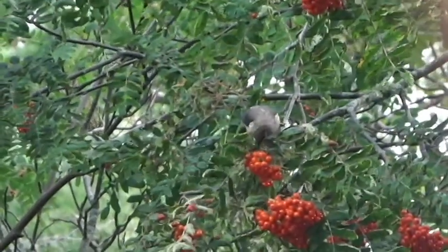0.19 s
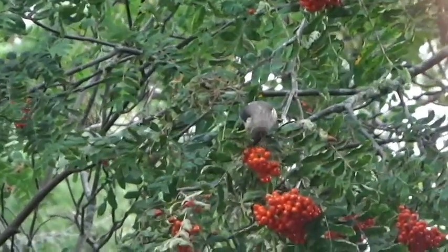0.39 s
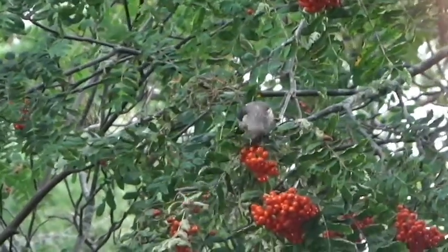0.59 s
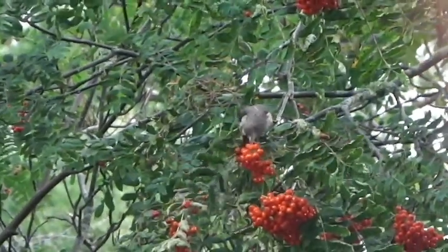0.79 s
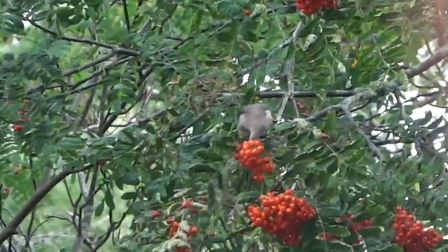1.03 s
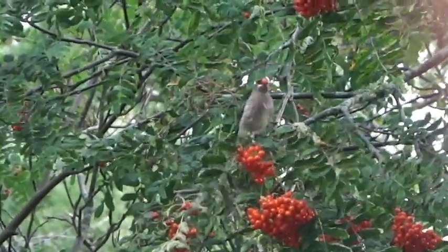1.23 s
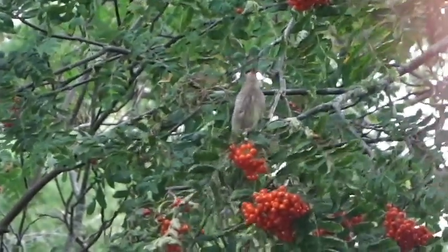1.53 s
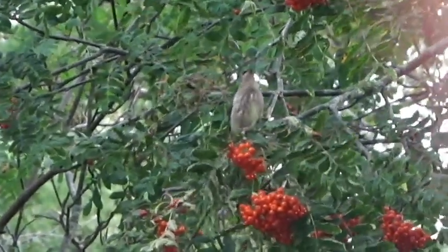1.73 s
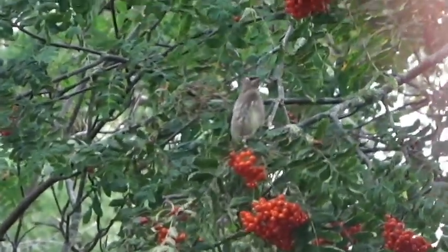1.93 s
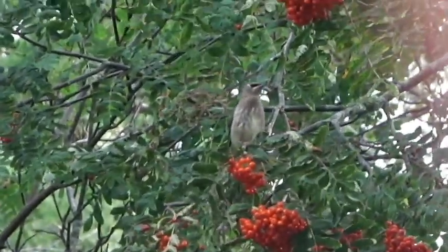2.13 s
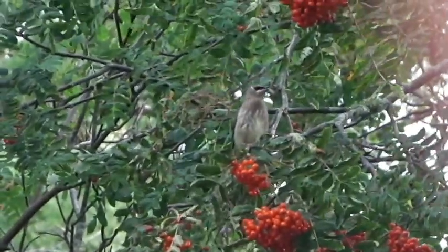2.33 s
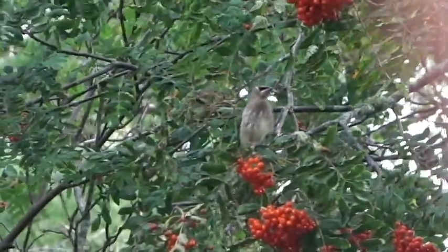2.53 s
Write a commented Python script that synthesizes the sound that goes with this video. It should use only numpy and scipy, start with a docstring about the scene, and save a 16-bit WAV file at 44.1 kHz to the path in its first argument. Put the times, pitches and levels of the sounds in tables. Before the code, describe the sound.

Waxwings trill thin and high outdoors, with one sharp snap and faint distant yelps.

```python
"""Waxwings trill thinly in a rowan tree: high whistles that buzz as their pitch shakes very fast,
scattered by the leaves. A farther bird, perhaps a jackdaw, gives short nasal yelps that rise and
fall, two of them clear, and distant trunks echo them. Close by come one sharp, ringing snap,
a few soft knocks and dull handling bumps. Twigs tick faintly over a quiet outdoor haze."""
import sys
import numpy as np
from scipy import signal
from scipy.fft import rfft, irfft
from scipy.io import wavfile
from scipy.ndimage import uniform_filter1d

SR = 44100
rng = np.random.default_rng(int(sys.argv[2]) if len(sys.argv) > 2 else 0)


def waveform_to_disk(signal):
    """Save audio, clipped to [-1, 1], as 16-bit WAV at the path in sys.argv[1]."""
    frames = np.transpose(np.atleast_2d(signal))
    scaled = np.clip(frames, -1, 1) * 32767
    samples = np.round(scaled).astype(np.int16)
    wavfile.write(sys.argv[1], SR, samples)


N = 119070  # 2.7 seconds

# Near waxwing calls, one a row. pan_db is left minus right; more roughness means a deeper buzz.
# start_s, length_s, first_pitch_hz, last_pitch_hz, level_db, trills_per_s, pan_db, roughness
NEAR_TRILLS = [(.503, 0.013, 7250, 7360, -51, 56, -2, .2), (.518, 0.055, 7070, 7280, -53, 29, -4, 1.3),
               (.552, 0.19, 7420, 6830, -47, 18.5, -2, 1.15), (.91, 0.1, 6850, 6510, -53, 35.4, -6.5, 0.88),
               (1.63, 0.13, 7440, 7400, -60.5, 36, -13, 1.03),
               (1.731, 0.083, 7570, 7400, -56, 35, -11, 0.73),
               (1.925, 0.245, 7290, 7000, -45, 35.2, -1.5, 1.08),
               (2.124, 0.18, 8240, 7430, -47.5, 40, 0.5, 1.47),
               (2.284, 0.166, 7130, 6750, -47, 30.3, -3, 1.01)]
# Thin, higher calls from deeper in the tree, with the same columns.
THIN_TRILLS = [(.055, 0.17, 8250, 8240, -58.5, 36.5, -2.7, 1.14),
               (.3, 0.15, 8300, 8280, -61, 37.7, -3, 0.85), (.36, 0.15, 7600, 7450, -64.5, 35.3, 1, .6),
               (.54, 0.21, 8100, 8320, -62.5, 37.3, 0, 1), (.795, 0.18, 8160, 8100, -57.5, 38, -3, 1.9),
               (1.235, 0.31, 8320, 8180, -59.5, 36.5, -5.5, 1.05),
               (1.555, 0.19, 8220, 8450, -57.5, 36.5, -1.95, 0.9),
               (1.825, 0.133, 8160, 8140, -53.5, 36.4, -4, 1.5),
               (1.945, 0.073, 8350, 8370, -50.5, 37, -2, 0.74), (2.39, 0.13, 8040, 7400, -63, 36.4, -2, 1)]

def waxwings(calls, buzz_per_s, buzz_hz, trill_hz, jitter_hz, throb_db, calm):
    """Each call is one buzzing whistle that gets higher, louder and purer at every trill crest."""
    out = np.zeros((2, N))
    attack_s, release_s = 0.009, 0.0096
    for start, length, first_hz, last_hz, db, trills_per_s, pan_db, roughness in calls:
        t = np.arange(0, length, 1 / SR)
        progress, size = t / length, len(t)
        crest = np.sin(np.pi * trills_per_s * t) ** 2
        trill = 2 * crest - 1
        # The buzz deepens through the call and eases at each crest.
        depth = roughness * (0.7 + progress / 2) * (1 - calm * crest ** 2)
        buzz = 2 * np.pi * np.cumsum(buzz_per_s * (1 + 0.217 * wander(size, 83))) / SR
        sweep = np.sin(buzz) + np.sin(2 * buzz) / 2  # quickly up, more slowly down
        hz = first_hz + (last_hz - first_hz) * progress ** 1.6 + trill_hz * trill
        hz += depth * (buzz_hz * sweep + jitter_hz * np.tanh(wander(size, 455)))
        phase = 2 * np.pi * np.cumsum(hz) / SR
        whistle = np.sin(phase) + amp(-28.5) * np.sin(2 * phase)
        fade = np.clip(np.minimum(t / attack_s, (length - t) / release_s), 0, 1)
        swell = amp(3 * np.sin(np.pi * progress) + throb_db * trill + 1.4 * wander(size, 77))
        pulse = 1 - np.clip(0.4 * depth, 0, 1) * np.cos(buzz)
        add(out, start, pan(pan_db) * amp(db) * unit(fade * swell * pulse * whistle))
    return out

# The farther bird's yelps: start_s, length_s, top_pitch_hz, level_db, upper_overtones_db, pan_db
YELPS = [(0.1, 0.074, 646, -66, -9, -3), (0.27, 0.053, 660, -62, 1, -4), (.36, .08, 513, -64.5, -8, -3),
         (1.027, .076, 517, -50.5, -11.5, -6.5), (1.307, 0.071, 553.7, -45, -0.5, -9.5)]
# The overtones of its voice: pitch_multiple, level_db
YELP_OVERTONES = [(2, -18), (3, 0), (4, -22), (5, -2), (6, -10), (8, -11)]
# How its throat boosts or softens them: frequency_hz, gain_db
YELP_THROAT = [(900, -11), (1300, -4.5), (1650, 0.5), (2800, 1), (3050, -15), (3350, -12), (4400, -3)]

def yelps():
    """A nasal voice with two strong overtones arches up and down in pitch."""
    out = np.zeros((2, N))
    for start, length, top_hz, db, upper_db, pan_db in YELPS:
        t = np.arange(0, length, 1 / SR)
        arch = np.sin(np.pi * t / length)
        waver = 1 + 0.015 * wander(len(t), 600)
        voice = 0
        for multiple, overtone_db in YELP_OVERTONES:
            is_upper = multiple * top_hz > 1900
            bend = 0.37 if is_upper else 0.299
            hz = multiple * top_hz * waver * (1 - bend * (1 - arch ** 1.303))
            level_db = overtone_db + curve_at(YELP_THROAT, hz) + is_upper * upper_db
            level_db += 2.5 * wander(len(t), 200)
            voice += amp(level_db) * np.sin(2 * np.pi * np.cumsum(hz) / SR)
        add(out, start, pan(pan_db) * amp(db) * unit(voice * arch ** 0.64))
    return out

# The tones that ring in the snap: pitch_hz, relative_level_db, fade_s, delay_s, right_lag_radians
SNAP_TONES = [(413, -12, 0.022, 0.0011, 1), (610, -2, 0.019, 0.00057, 3.5), (845, -2.5, 0.012, 0.00094, 4),
              (1010, -10, 0.01, 0.0012, 4), (1190, -7.5, 0.013, 0.00064, 1.13),
              (1920, -2, 0.0078, 0.00056, 0.88), (2440, -16, 0.022, 0.00015, 4.5),
              (3270, 2.5, 0.0074, 0.00017, -1.53), (4190, 1.5, 0.0079, 0.0001, -2),
              (4930, 0, 0.0065, 0.00024, 2.1), (5900, 4.5, 0.0054, 0.00022, -3),
              (8200, -1, 0.0072, 0.000093, 3.5), (9640, -2.5, 0.004, .0002, -5.02)]

def snap():
    """A close, dry snap: a crack and bright ringing first, the low tones just after."""
    out, t = np.zeros((2, N)), np.arange(2000) / SR
    start_s, ring_db = 0.9515, -16
    for hz, db, fade_s, delay_s, lag in SNAP_TONES:
        ring = stereo_tone(t, hz, lag) * (1 - np.exp(-t / 0.00025))
        add(out, start_s + delay_s, amp(ring_db + db) * die_away(t, fade_s) * ring)
    crack = rng.standard_normal((2, len(t))) * (1 - np.exp(-t / 0.00032))
    crack *= amp(-20) * die_away(t, fade_s=0.0067)
    add(out, start_s, keep_band(crack, "low", 12000))
    return keep_band(out, "high", 390)

# Soft knocks, the loudest in pairs: start_s, pitch_hz, level_db
KNOCKS = [(1.0003, 457, -35.5), (1.0118, 426, -41.5), (1.168, 446, -44.5), (1.7005, 435, -37),
          (1.7105, 442, -40.5)]
# Dull handling bumps: start_s, pitch_hz, level_db
BUMPS = [(.108, 107, -51), (.218, 76, -42.5), (.279, 90, -46.5), (.299, 107, -41), (.328, 81.5, -42.5),
         (.388, 92, -46.5), (.663, 76, -44.5), (.951, 100, -46), (1.19, 81.2, -46.5), (1.225, 109, -48),
         (1.898, 90, -45.5), (2.135, 116, -48), (2.214, 111, -42.5), (2.237, 78, -45)]

def thuds(blows, rise_s, pan_db, lag_radians):
    """Each soft blow is a low tone that swells and dies within a few cycles."""
    out, t = np.zeros((2, N)), np.arange(6000) / SR
    swell = t / rise_s * np.exp(1 - t / rise_s)
    for start, hz, db in blows:
        add(out, start, pan(pan_db) * amp(db) * swell * stereo_tone(t, hz, lag_radians))
    return out

# Faint dry ticks among the twigs: start_s, level_before_filter_db
TWIG_TICKS = [(.2774, -51), (1.952, -44), (2.0622, -39)]

def twig_ticks():
    """Each tick is a tiny, bright burst of noise."""
    out, t = np.zeros((2, N)), np.arange(1500) / SR
    for start, db in TWIG_TICKS:
        add(out, start, rng.standard_normal((2, len(t))) * amp(db) * die_away(t, fade_s=0.029))
    return keep_band(out, "band", [2780, 7000])

def scatter(sound, fade_s, echo_db, likeness):
    """Leaves and other surfaces add many small echoes, partly alike in both ears."""
    t = np.arange(SR) / SR
    left, other = rng.standard_normal((2, SR)) * die_away(t, fade_s) * (t > 0.001)
    tail = np.array([left, blend(left, other, likeness)]) / np.linalg.norm(left)
    echoes = amp(echo_db) * signal.fftconvolve(sound, tail, axes=1)[:, :N]
    return (sound + echoes) / np.hypot(1, amp(echo_db))  # keeps about the same power

def far_trees(sound, fade_s, echo_db, top_hz):
    """Distant trunks send back a long, dull echo."""
    t = np.arange(SR) / SR
    tail = unit(rng.standard_normal((2, SR)) * die_away(t, fade_s) * (t > 0.01)) / np.sqrt(SR)
    tail = keep_band(tail, "low", top_hz, order=4)
    return sound + amp(echo_db) * signal.fftconvolve(sound, tail, axes=1)[:, :N]

# The low outdoor haze: frequency_hz, relative_level_db
LOW_HAZE = [(15, -23), (25, -21), (97, -7), (140, -9), (231, -18), (410, 1.5), (579, -6.5), (958, -5.5),
            (1070, -9.5), (1350, -12.5), (1950, -13), (2090, -14), (2820, -14.5), (3090, -15), (6000, -15),
            (7800, -48), (13200, -120)]
# The thin hiss above it: frequency_hz, relative_level_db
HIGH_HISS = [(4500, -25), (6200, 1.5), (9200, 0), (9900, -7.5), (14000, -6), (16000, -17)]
# How alike the two sides are: frequency_hz, likeness (1 is alike, 0 or less is unrelated)
SIDE_LIKENESS = [(60, -0.38), (130, -0.74), (290, -0.15), (640, -0.077), (1410, -0.87), (3100, -0.044),
                 (6820, 0.17), (15000, 1)]
# How far the left side runs ahead: frequency_hz, lead_radians
LEFT_LEAD = [(0, 0), (5340, 2), (6630, 8.5), (8180, 5), (8870, 0.5), (13400, 2.5), (14400, 2), (16200, 23)]
# How much louder the left side is: frequency_hz, pan_db
HAZE_PAN = [(60, 8.5), (120, 4.5), (240, -0.5), (480, -5.5), (950, -6), (1890, -2), (3770, -2.5),
            (7520, -1), (15000, 2)]

def haze(spectrum, level_db, top_hz, patchy_db):
    """Steady outdoor noise with faint drifting patches, a little different on each side."""
    hz = np.fft.rfftfreq(2048, 1 / SR)
    a, b, c, d, patches = rng.standard_normal((N // 512 + 5, len(hz), 5)).T
    left, other = a + 1j * b, c + 1j * d  # noise by frequency (rows) and time (columns)
    patches = unit(uniform_filter1d(uniform_filter1d(patches, 20, 0), 7, 1))
    likeness = np.clip(curve_at(SIDE_LIKENESS, hz), 0, 1)[:, None]
    right = blend(left, other, likeness) * np.exp(-1j * curve_at(LEFT_LEAD, hz))[:, None]
    side = amp(curve_at(HAZE_PAN, hz) / 2)[:, None]
    colour = amp(curve_at(spectrum, hz)) / np.sqrt(1 + (hz / top_hz) ** 20)
    slices = np.array([left * side, right / side]) * colour[:, None] * amp(patchy_db * patches)
    return amp(level_db) * unit(signal.istft(slices, nperseg=2048, noverlap=1536)[1][:, :N])

def amp(db):
    """Turns decibels into a gain."""
    return 10 ** (np.asarray(db) / 20)

def unit(sound):
    """Scales a sound to an average power of 1."""
    return sound / np.sqrt(np.mean(sound ** 2) + 1e-20)

def die_away(t, fade_s):
    """A level that falls 60 dB every fade_s seconds."""
    return amp(-60 * t / fade_s)

def curve_at(points, hz):
    """Looks up a value between the rows of a frequency table."""
    row_hz, values = np.transpose(points)
    return np.interp(np.log(hz + 1), np.log(row_hz), values)

def add(mix, start_s, sound):
    """Adds a sound into the stereo mix."""
    part = mix[:, round(start_s * SR):][:, :sound.shape[-1]]
    part += sound[..., :part.shape[1]]

def pan(db):
    """Left and right gains, db apart."""
    return amp([[db / 2], [-db / 2]])

def stereo_tone(t, hz, lag_radians):
    """A pure tone whose right side runs behind its left."""
    return np.sin(2 * np.pi * hz * t - np.array([[0], [lag_radians]]))

def blend(noise, other, likeness):
    """Mixes two noises so the result is partly like the first."""
    return likeness * noise + np.sqrt(1 - likeness ** 2) * other

def keep_band(sound, kind, hz, order=2):
    """Lets the lows, the highs or a middle band through."""
    return signal.sosfilt(signal.butter(order, hz, kind, fs=SR, output="sos"), sound)

def wander(size, rate_hz):
    """A smooth random wobble, up to about rate_hz."""
    hz = np.fft.rfftfreq(SR, 1 / SR)
    return unit(irfft(rfft(rng.standard_normal(SR)) * np.exp(-(hz / rate_hz) ** 2)))[:size]

# The low haze's slight rise and fall: time_s, gain_db
HAZE_SWELL = [(0, 1), (.2, 0.5), (.55, 1), (.8, 0), (1.2, .5), (1.55, -.5), (2.7, -0.5)]

def scene():
    """Birds among leaves and trees, small noises close by, and the haze behind them."""
    near = waxwings(NEAR_TRILLS, buzz_per_s=150, buzz_hz=360, trill_hz=200, jitter_hz=320,
                    throb_db=3.3, calm=0.85)
    near = scatter(near, fade_s=0.03, echo_db=-5, likeness=0.4)
    thin = waxwings(THIN_TRILLS, buzz_per_s=170, buzz_hz=215, trill_hz=80, jitter_hz=140,
                    throb_db=1.6, calm=0.2)
    thin = scatter(thin, fade_s=0.04, echo_db=1, likeness=0.13)
    flock = scatter(near + thin, fade_s=0.5, echo_db=-5.5, likeness=0.1)
    far_bird = scatter(yelps(), fade_s=0.4, echo_db=-12, likeness=0.76)
    far_bird = far_trees(far_bird, fade_s=1.1, echo_db=-7.5, top_hz=1850)
    close = scatter(snap(), fade_s=0.11, echo_db=-20, likeness=0.2) + twig_ticks()
    close += thuds(KNOCKS, rise_s=0.0031, pan_db=-11, lag_radians=2.72)
    close += thuds(BUMPS, rise_s=0.0036, pan_db=-2.5, lag_radians=0.27)
    swell = amp(np.interp(np.arange(N) / SR, *np.transpose(HAZE_SWELL)))
    air = swell * haze(LOW_HAZE, level_db=-52, top_hz=5690, patchy_db=1)
    hiss = haze(HIGH_HISS, level_db=-59.5, top_hz=15500, patchy_db=1.9)
    return flock + far_bird + close + air + hiss

def record(dry):
    """The microphone has a narrow dip in the treble, and the very highest sounds are cut off."""
    dip_hz, dip_width_hz, top_hz = 7730, 47, 15750
    hz = np.fft.rfftfreq(N, 1 / SR)
    dip = 1 - np.exp(-((hz - dip_hz) / dip_width_hz) ** 2)
    top_cut = signal.firwin(511, top_hz, window=("kaiser", 9), fs=SR)
    return signal.oaconvolve(irfft(rfft(dry) * dip, N), top_cut[None], "same")

dry = scene()
out = record(dry)
waveform_to_disk(out)
```